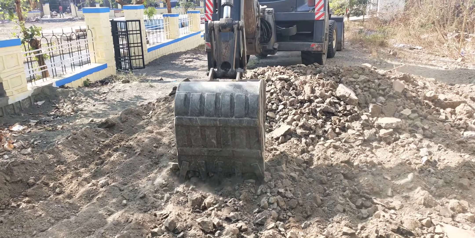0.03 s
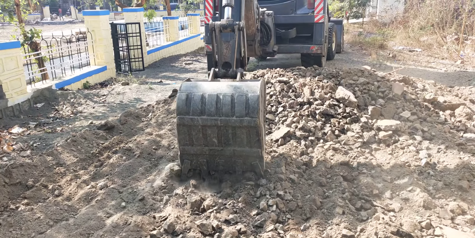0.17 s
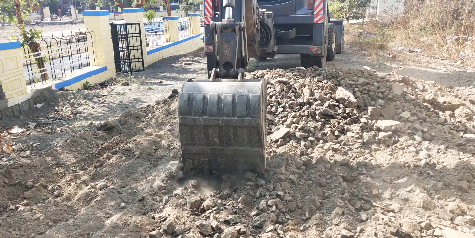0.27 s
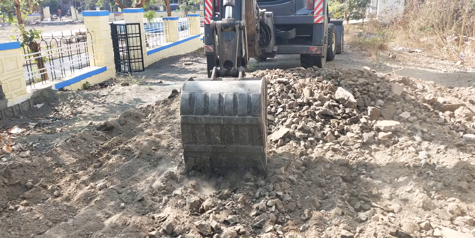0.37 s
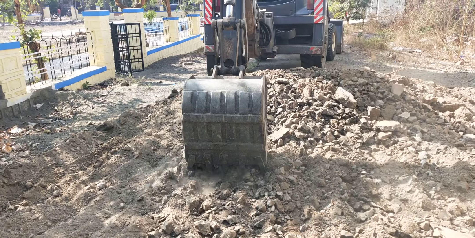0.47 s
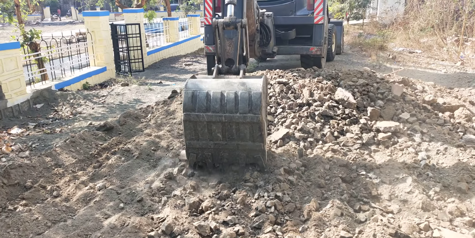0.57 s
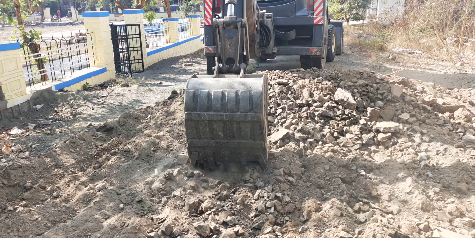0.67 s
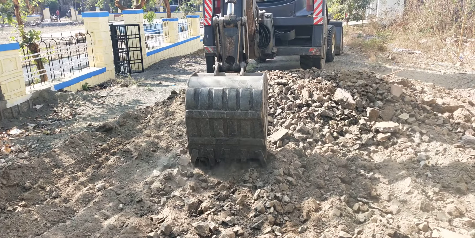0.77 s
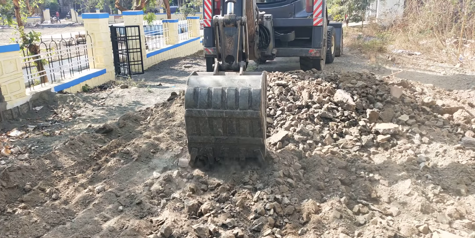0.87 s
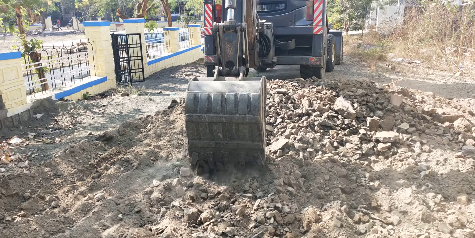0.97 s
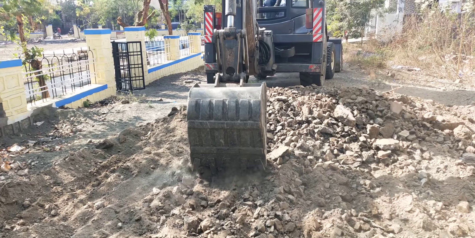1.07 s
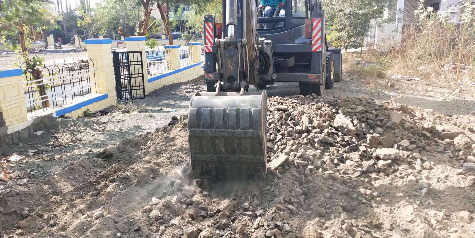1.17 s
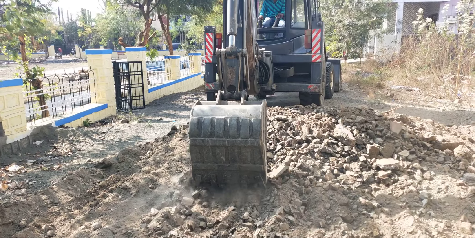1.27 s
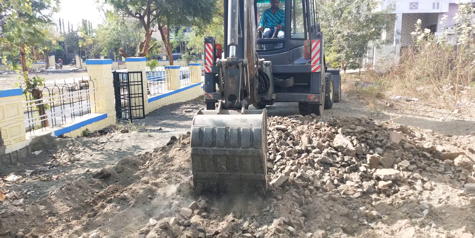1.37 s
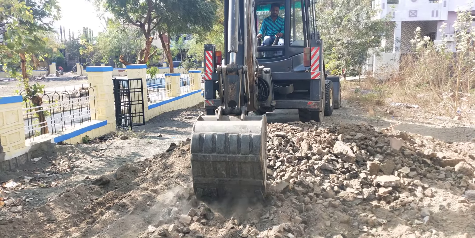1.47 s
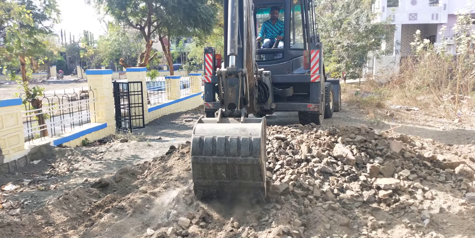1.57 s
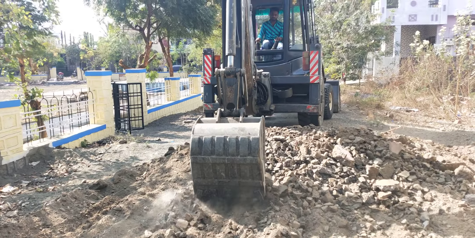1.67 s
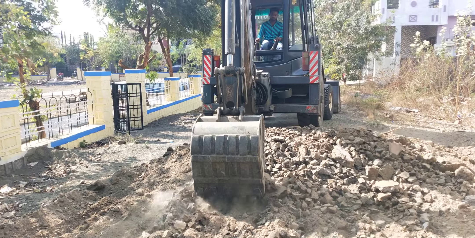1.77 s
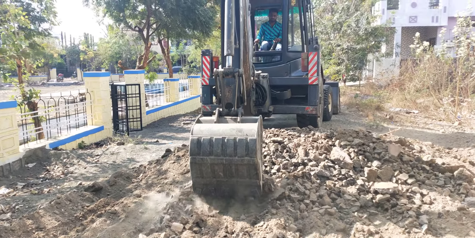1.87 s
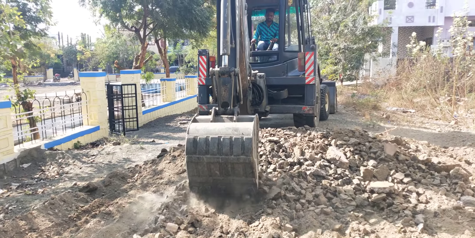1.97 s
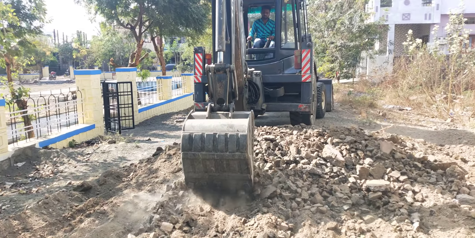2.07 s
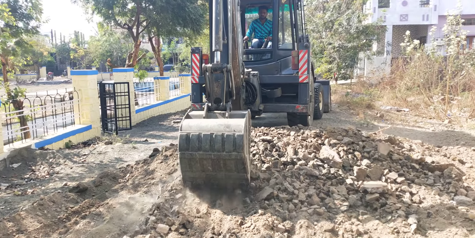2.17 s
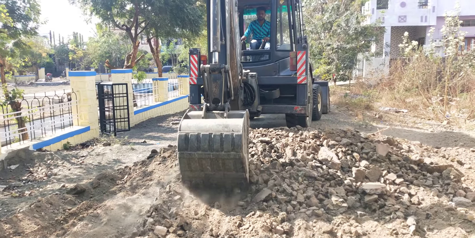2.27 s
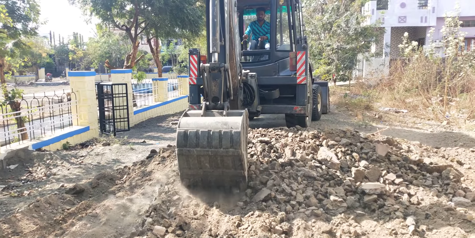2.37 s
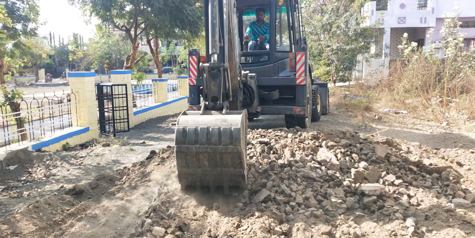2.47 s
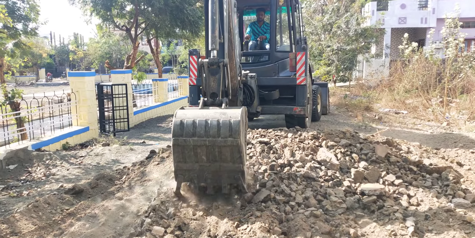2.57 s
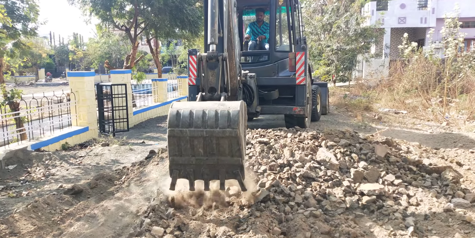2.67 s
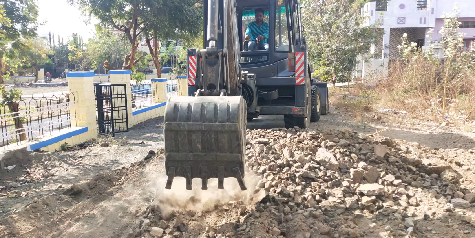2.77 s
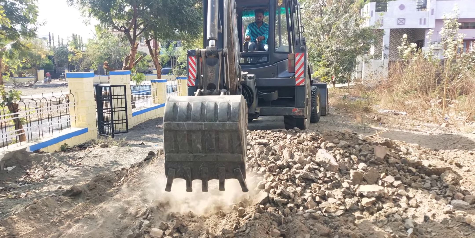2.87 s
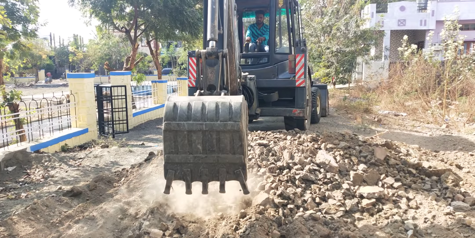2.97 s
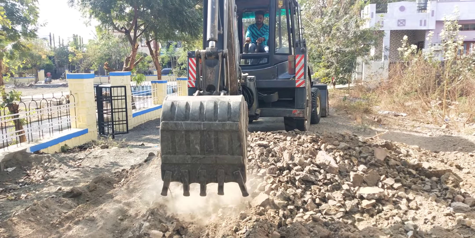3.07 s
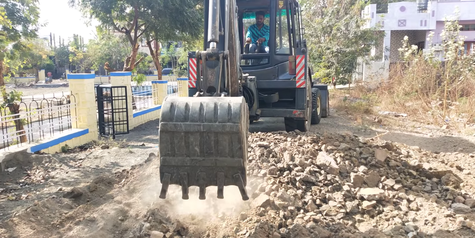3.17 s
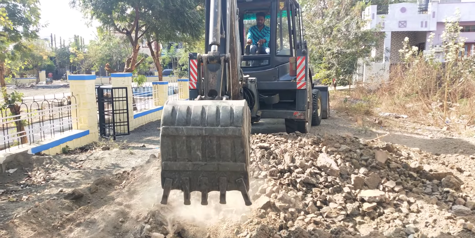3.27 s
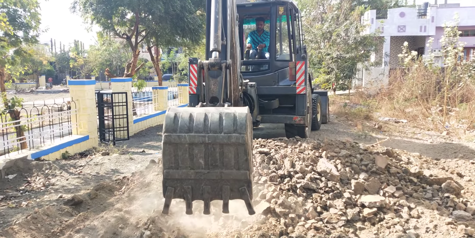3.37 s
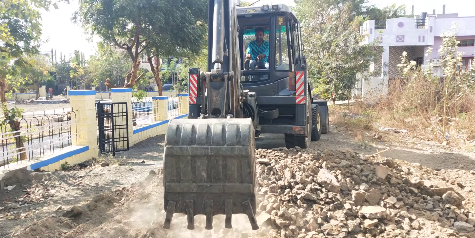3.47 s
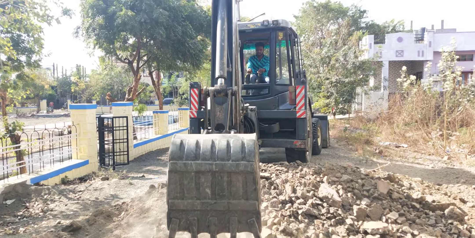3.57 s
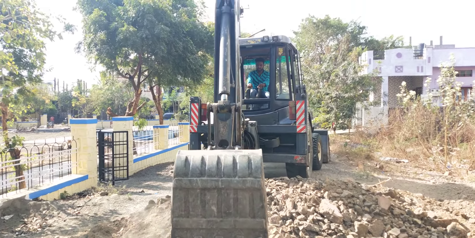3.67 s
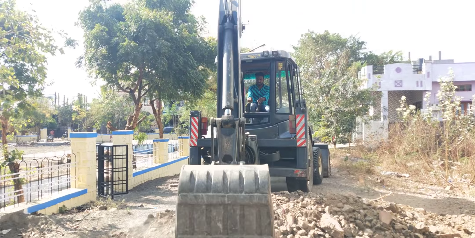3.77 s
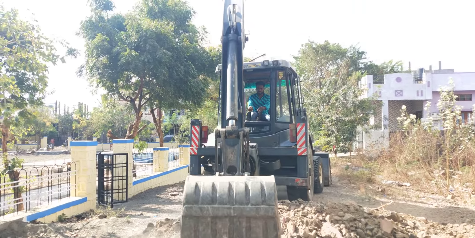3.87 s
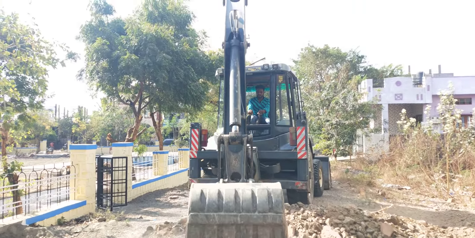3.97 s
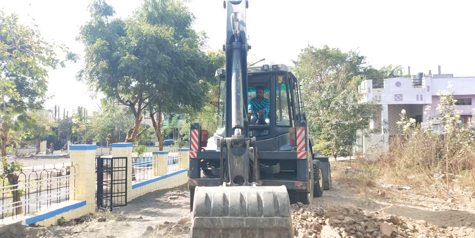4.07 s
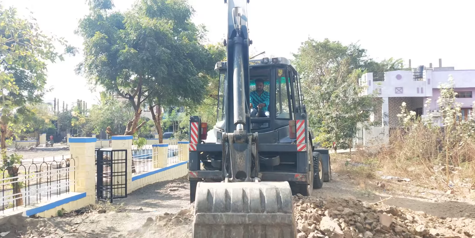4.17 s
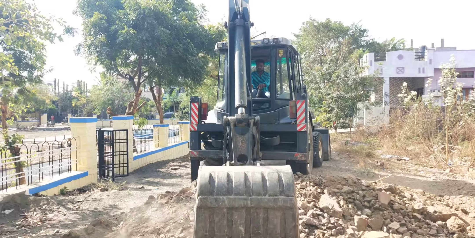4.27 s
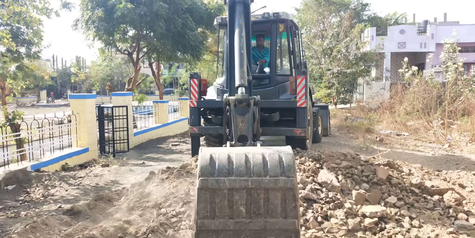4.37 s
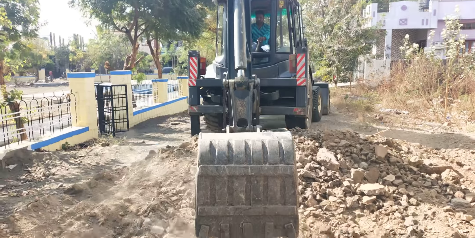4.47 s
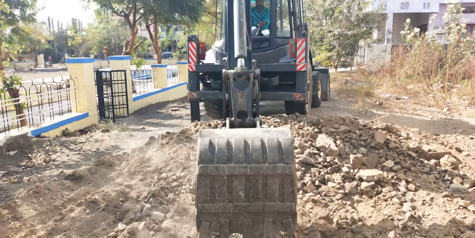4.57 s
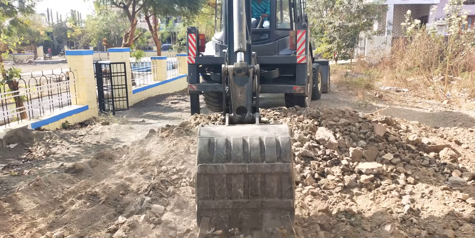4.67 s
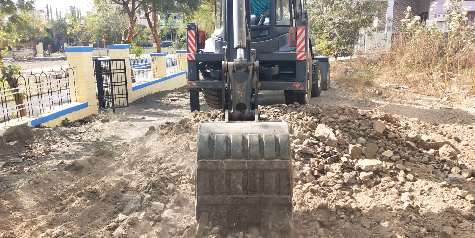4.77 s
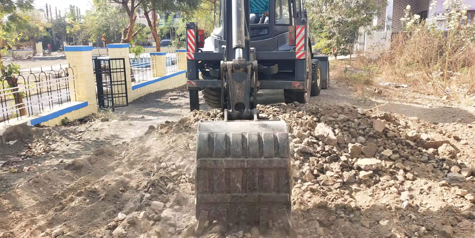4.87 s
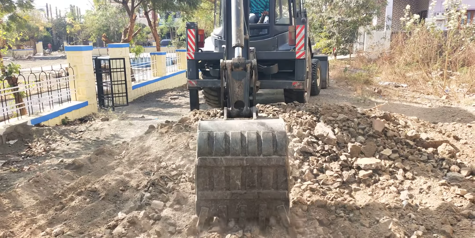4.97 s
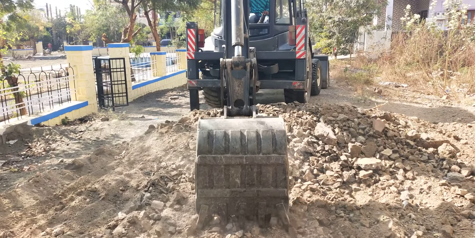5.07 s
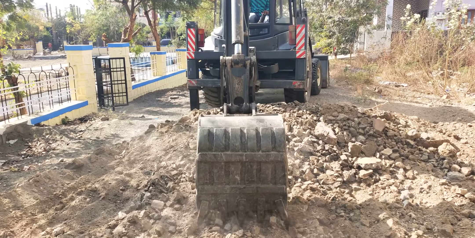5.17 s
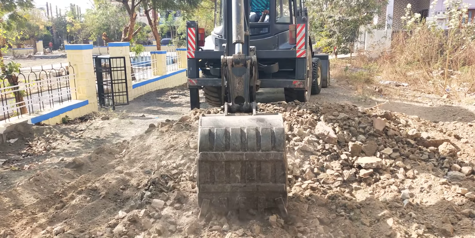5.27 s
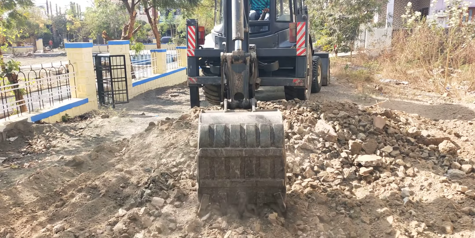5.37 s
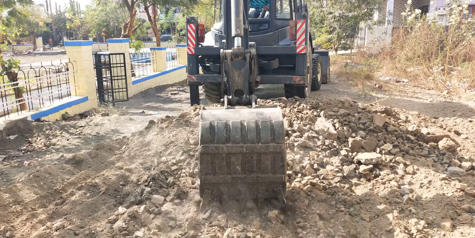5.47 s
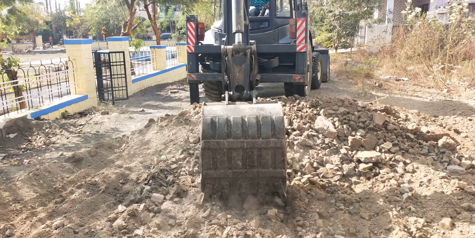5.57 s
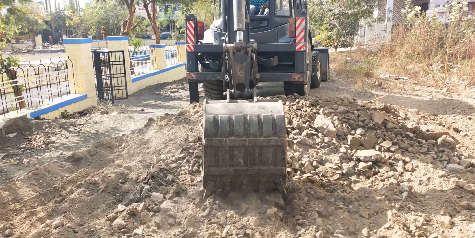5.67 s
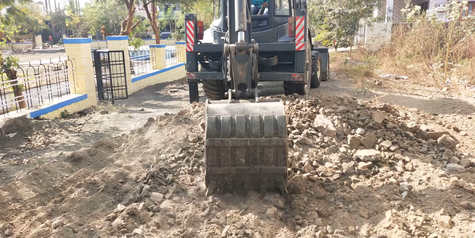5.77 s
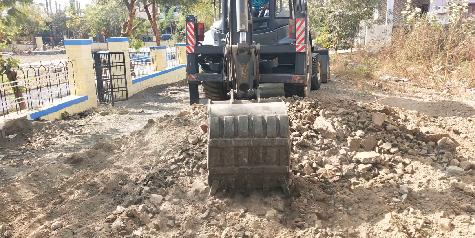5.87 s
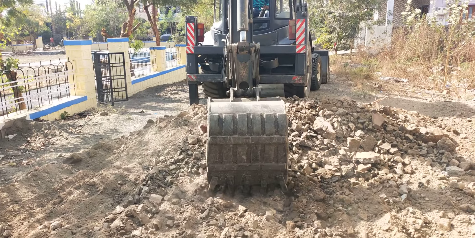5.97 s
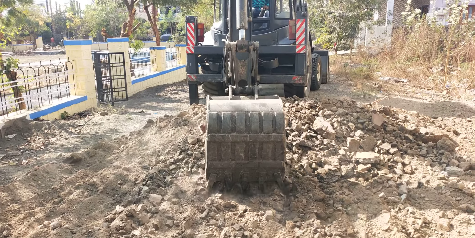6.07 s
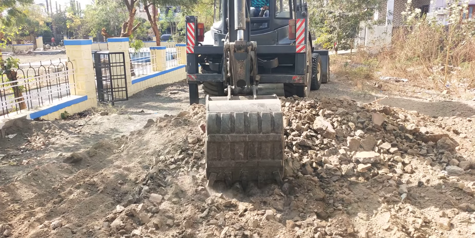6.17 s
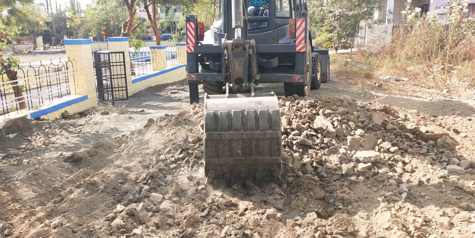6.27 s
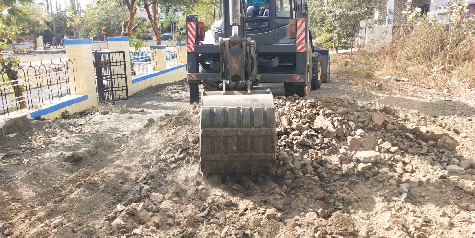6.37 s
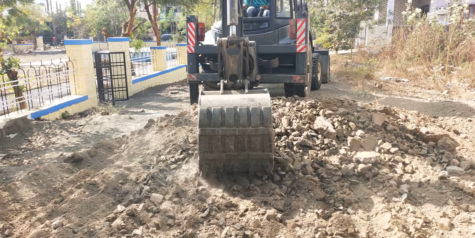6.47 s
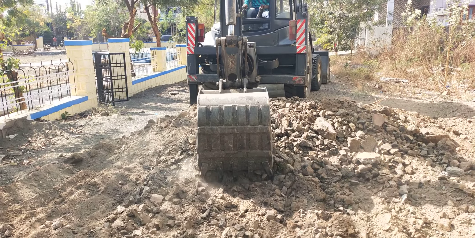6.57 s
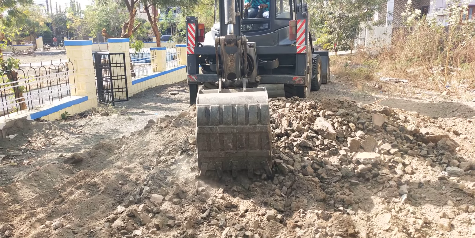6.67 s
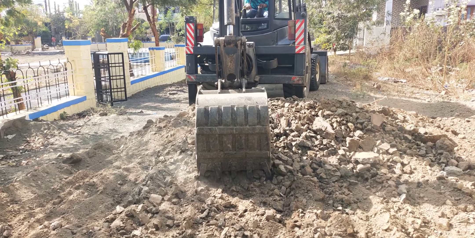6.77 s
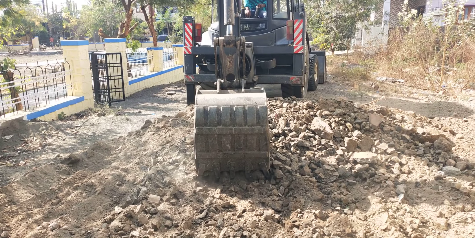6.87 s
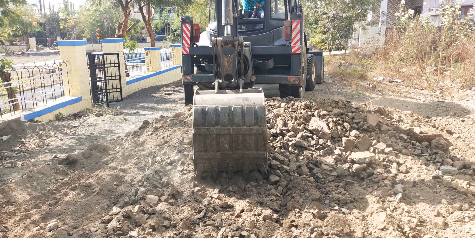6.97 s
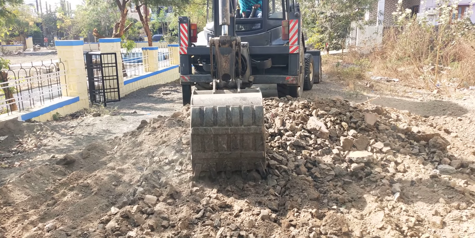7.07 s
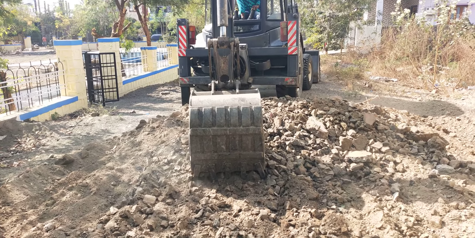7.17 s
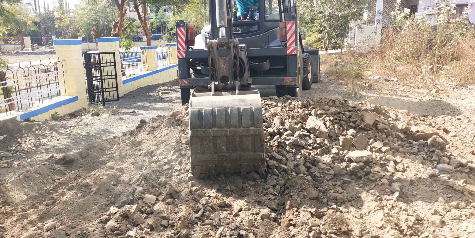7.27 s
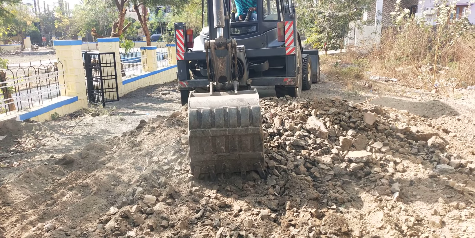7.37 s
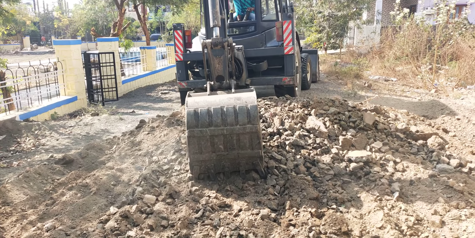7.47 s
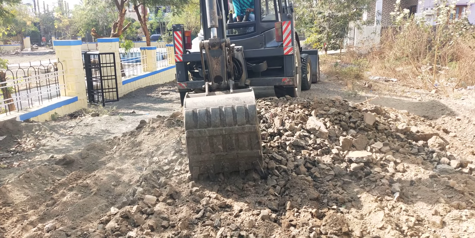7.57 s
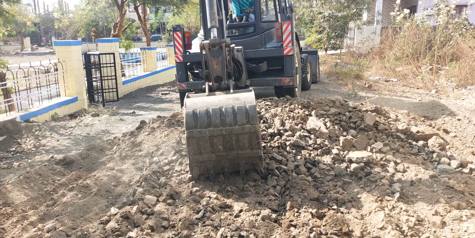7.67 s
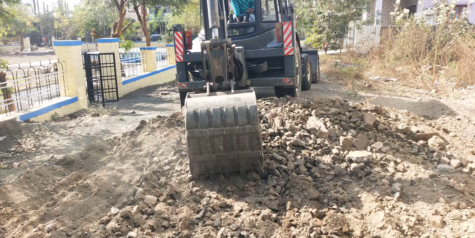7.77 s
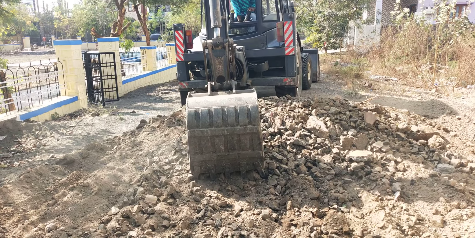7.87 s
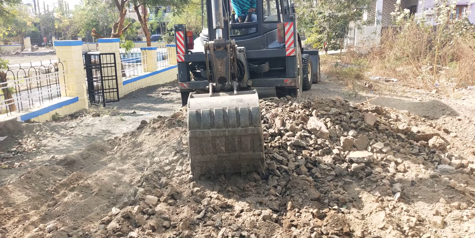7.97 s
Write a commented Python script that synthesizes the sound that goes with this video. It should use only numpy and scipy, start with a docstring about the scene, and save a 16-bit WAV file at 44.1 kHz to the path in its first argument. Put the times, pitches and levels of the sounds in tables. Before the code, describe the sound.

A roadside stone heap, heard close by on a handheld stereo microphone with short scattered wall echoes. From 0 s a heavy steel bucket scrapes rubble with coarse grit, hollow groans around the middle pitches and small stone knocks. At 0.9 to 1.7 s it grows violent: dense, loud clangs and crunches, brief ringing. It quietens by 1.9 s, then one hard clank strikes at 2.4 s. Until 4.4 s a faint low diesel idle remains, with a few loose metal rattles to the left near 3 s and treble oil hiss swelling around 4 s. At 4.5 s the second drag begins, loudest from 4.7 to 5.1 s, with grinding, groans and bangs; further blows at 5.9 and 6.3 s. It thins out, a softer scrape and hiss come at 7.1 to 7.3 s, then weak clunks and idle to 8 s.

```python
"""By a walled road, a steel excavator bucket is dragged twice through broken stone, a few metres from
a handheld camera with two microphone ports. Noise and grit drive many short modes of the shell:
scraping, short fuzzy tones and blows. Behind it a diesel idles as multiples of its firing rate in low
wash, loose parts rattle as narrow noise, and oil hisses through the valves as spurts of treble noise.
Decaying noise makes the echoes of the walls and a short scattering of the treble."""
import sys
import numpy as np
from scipy import signal
from scipy.fft import rfft, irfft
from scipy.io import wavfile
from scipy.ndimage import uniform_filter1d

SR = 44100
rng = np.random.default_rng(int(sys.argv[2]) if len(sys.argv) > 2 else 0)


def to_wav(s):
    """Save 16-bit WAV."""
    ch = np.atleast_2d(s).T  # columns
    pcm = np.round(np.clip(ch, -1, 1) * 32767)  # PCM
    wavfile.write(sys.argv[1], SR, pcm.astype(np.int16))


N = 354167


def gain_of(db):
    """Amplitude factor of a level in dB."""
    return 10 ** (np.asarray(db) / 20)


def evened(x):
    """Scales to an rms of 1."""
    return x / np.sqrt(np.mean(x ** 2) + 1e-20)


def steadied(x, size=7000):
    """Holds the level near 1 over about a sixth of a second; quicker changes stay."""
    power = uniform_filter1d(uniform_filter1d(x ** 2, size), size)
    return x / np.sqrt(abs(power) + 1e-20)


def read_curve(points, hz):
    """Reads a (frequency, value) curve at hz, straight along log frequency."""
    f, value = np.transpose(points)
    return np.interp(np.log(hz + 1), np.log(f + 1), value)


def per_sample(rows):
    """Columns of a (time, ...) table, one value a sample."""
    s, *columns = np.transpose(rows)
    return [np.interp(np.arange(N) / SR, s, column) for column in columns]


def add(mix, s, sound):
    """Lays a sound into the mix at s seconds, cut at the end."""
    part = mix[round(s * SR):][:len(sound)]
    part += sound[:len(part)]


def band(x, lo_hz, hi_hz):
    """Keeps the sound between two frequencies."""
    return signal.sosfilt(signal.butter(3, [lo_hz, hi_hz], "band", fs=SR, output="sos"), x)


def wander(per_s):
    """Slow random drift, joining per_s normal draws a second by straight lines."""
    count = int(N / SR * per_s) + 2
    return np.interp(np.linspace(0, count - 1, N), np.arange(count), rng.standard_normal(count))


def peaks(rows, rise_db_per_s, fall_db_per_s):
    """Level in dB that climbs to each (start, length, dB), holds and falls away."""
    t = np.arange(0, N / SR, .005)
    s, length, db = np.transpose(rows)[:, :, None]
    before, after = np.maximum(s - t, 0), np.maximum(t - s - length, 0)
    level = db - rise_db_per_s * before - fall_db_per_s * after
    return np.interp(np.arange(N) / SR, t, level.max(0))


def patchy(x, depth_db):
    """Lifts and sinks patches about 200 Hz wide and 80 ms long."""
    z = signal.stft(x, nperseg=512, noverlap=384)[2]
    patches = rng.standard_normal(z.shape[::-1]).T
    for _ in range(2):
        patches = uniform_filter1d(uniform_filter1d(patches, size=2, axis=0), size=18, axis=1)
    z = z * gain_of(depth_db * evened(patches))
    return signal.istft(z, nperseg=512, noverlap=384)[1][:N]


def dying_noise(colour, t60, stretch=1.0, size=9000):
    """Noise of energy 1 whose bands die at their own speed: the ring of very many modes."""
    spectrum = rfft(rng.standard_normal(size))
    noise = irfft(spectrum * gain_of(read_curve(colour, np.fft.rfftfreq(size, 1 / SR))), size)
    hz, t, z = signal.stft(noise, SR, nperseg=256, noverlap=192)
    decay_db = -60 * t / (stretch * read_curve(t60, hz)[:, None])
    ring = signal.istft(z * gain_of(decay_db), SR, nperseg=256, noverlap=192)[1][:size]
    return ring / np.linalg.norm(ring)


def spot(stretch=0.88, spread_db=7.0, plate_db=6.0, loose=0.0052):
    """The ring of the bucket struck at one place, which wakes each mode by its own amount."""
    # strongest modes of the shell before chance and stretch: (frequency [Hz], width [Hz], level [dB])
    shell = [(110, 7.4, -16.5), (285, 47, -3), (550, 22, 1), (603.2, 6.8, -1.5), (726, 11, 1),
             (916.5, 48, 6.5), (1103, 24, -2), (1513, 38, -1), (1944, 22, -9.5), (2003, 31, -6.5),
             (2486, 52, -3.5), (2810, 51, -9), (3120, 39, -9.5)]
    # colour of the dense small modes: (frequency [Hz], density [dB per Hz, relative])
    plate = [(35, -65.5), (60, -35), (115, -8.5), (210, -19), (278, -9.5), (413, -13.5), (546, -7.5),
             (721, -2.5), (792, -14), (889, -16.5), (2150, -5.5), (4030, -21), (5200, -13), (6200, -24.5),
             (7030, -32.5), (15500, -49.5)]
    # their decay to -60 dB, before the stretch: (frequency [Hz], time [s])
    plate_t60 = [(100, 0.23), (500, 0.19), (2000, 0.082), (6000, 0.21), (12000, 0.029)]
    t = np.arange(9000) / SR
    hz, width, db = np.transpose(shell)[:, :, None]
    share, detune, phase = rng.standard_normal((3, len(shell), 1))
    height = gain_of(db + spread_db * share) * np.sqrt(width)
    decay = np.exp(-np.pi * width * t / np.sqrt(stretch))
    tones = np.sin(2 * np.pi * (hz * (1 + loose * detune) * t + phase))
    modes = (height * decay * tones).sum(0)
    return modes / np.linalg.norm(modes) + gain_of(plate_db) * dying_noise(plate, plate_t60, stretch)


def grinding(chips_per_s=500, size_db=3.0, grind=0.66):
    """Chips and a fine grinding excite the bucket at eight places, each waking its own mix of modes."""
    out = np.zeros(N)
    for _ in range(8):
        hits = rng.random(N) < chips_per_s / 8 / SR
        chips = gain_of(size_db * np.minimum(rng.exponential(1, N), 3)) * hits
        force = evened(chips) + grind * rng.standard_normal(N)
        force = force * gain_of(5.5 * wander(30) + 6.2 * wander(6))
        out += signal.oaconvolve(force, spot(plate_db=-4.0, loose=.03))[:N]
    return patchy(out, 4.66)


def drone(mode_hz=550, half_width_hz=23.3):
    """The steady drag of the teeth drives the main mode; the load damps and spreads it."""
    force = rng.standard_normal(N) * gain_of(2.9 * wander(40))
    core = band(force, mode_hz - half_width_hz, mode_hz + half_width_hz)
    return evened(core) + 0.55 * evened(band(force, 0.844 * mode_hz, 1.29 * mode_hz))


def scrape():
    """The drags: grinding in four bands follows pressure and grit, and the main mode groans."""
    # two drags through the rubble: (time [s], pressure on the shell [dB], grit of the stones [dB])
    drag = [
        [(0.0, -27.5, -35.5), (0.08, -51, -42.5), (0.19, -33, -31.5), (0.3, -43.5, -44.5), (0.53, -35.5, -44.5),
         (0.77, -42.5, -41.5), (0.95, -24, -27), (1.06, -55.5, -46), (1.2, -31.5, -36.5), (1.335, -40, -34.5),
         (1.38, -24.5, -32), (1.59, -29, -29.5), (1.71, -31, -29.5), (1.78, -38.5, -37), (1.93, -55.5, -74),
         (2.26, -68, -67), (2.38, -39.5, -49), (2.5, -53, -61), (2.69, -72.5, -62), (3.2, -84.5, -67.5)],
        [(4.45, -87, -63), (4.52, -28, -33), (4.65, -47, -65), (4.71, -27, -30), (4.8, -34, -29),
         (4.9, -30, -28), (5.1, -26, -38), (5.2, -35, -40), (5.33, -55, -53), (5.4, -41, -68), (5.51, -36, -49),
         (5.6, -40, -41.5), (5.7, -42.5, -65), (5.75, -41.5, -45.5), (6.09, -42, -46), (6.42, -49, -59),
         (6.59, -51.5, -45), (6.69, -60, -63), (6.93, -61, -66), (7.07, -59, -62), (7.14, -31.5, -45),
         (7.22, -28.5, -45), (7.32, -49.5, -68), (7.46, -59, -63.5), (7.52, -53, -60.5), (7.59, -46.5, -62),
         (7.83, -62, -58.5), (8.03, -64, -65)],
    ]
    # groans of the main mode: (start [s], length [s], level [dB])
    groans = [(.04, 0.079, -38.5), (.175, 0.0047, -19.5), (.21, 0.013, -29), (.26, 0.2, -36),
              (.46, 0.18, -36), (.62, 0.32, -43.5), (.92, 0.049, -26), (1.12, 0.036, -27.5),
              (1.38, 0.18, -33), (4.5, 0.14, -44), (4.72, 0.11, -29.5), (5.08, 0.17, -36),
              (5.27, 0.042, -31), (5.33, 0.037, -50), (5.44, 0.15, -28.5), (5.63, 0.066, -35),
              (5.78, 0.17, -36), (5.91, 0.075, -27), (6.16, 0.13, -36.5), (6.4, 0.089, -38),
              (6.55, 0.025, -43), (6.75, 0.019, -43.5)]
    press_db, grit_db = per_sample(drag[0] + drag[1])
    load_db = -54.5 + 0.91 * (press_db + 40)
    fine_db = -55.5 + 0.7 * (grit_db + 40)
    groan_db = peaks(groans, 451.5, 150.5)
    ground = grinding()
    layers = [
        (load_db, band(ground, 210, 380)),  # thud of the load
        (press_db, band(ground, 470, 1100)),
        (grit_db, band(ground, 1100, 3500)),
        (fine_db, band(ground, 3500, 15500)),  # finest grit
        (groan_db, drone()),
    ]
    return sum(gain_of(db) * steadied(part) for db, part in layers)


def in_turns(x, irs_of, places, turns):
    """Sends x through several random stereo responses that fade into one another."""
    out, turn = np.zeros((2, N)), np.cumsum(rng.integers(1, places, turns)) % places
    for k in range(places):
        share = np.interp(np.linspace(0, turns - 1, N), np.arange(turns), turn == k)
        out += signal.oaconvolve((np.sqrt(share) * x)[None], irs_of(), axes=1)[:, :N]
    return out


def scatter(x):
    """Short treble scattering, different at each port, fading between six random responses."""
    colour = [(1500, -19.0), (3000, -25), (4500, -5), (8000, -1.0)]  # (frequency [Hz], level [dB])
    t60 = [(100, 0.057), (9000, 0.0063)]  # (frequency [Hz], time [s])

    def bounces():
        taps = [dying_noise(colour, t60, size=2048) for _ in range(2)]
        return np.array(taps) * gain_of([[-.6], [.6]])
    return in_turns(x, bounces, places=6, turns=80)


def walls(x, side_hz=600):
    """Scattered echoes, fading between four random tails; bass alike at both ports, treble unlike."""
    # decay of the echoes to -60 dB: (frequency [Hz], time [s])
    echo_t60 = [(200, 0.23), (1000, 0.33), (5000, 0.32), (12000, 0.18)]
    colour = [(80, -12), (600, 0), (3000, 1.5), (7000, 7)]  # (frequency [Hz], level [dB])
    high_pass = signal.butter(2, side_hz, "high", fs=SR)

    def echoes():
        mid, side = [np.r_[np.zeros(120), dying_noise(colour, echo_t60, size=24000)] for _ in range(2)]
        side = signal.lfilter(*high_pass, side)
        return np.array([mid + side, mid - side]) / np.sqrt(2)
    return in_turns(x, echoes, places=4, turns=40)


def engine():
    """Idling diesel: low multiples of the firing rate; the upper ones waver most."""
    # the idle before its jitter: (time [s], firing rate [Hz], level [dB])
    firing = [(0, 44.7, -51), (.7, 45.66, -50), (1.3, 44.2, -50), (1.7, 44.1, -60), (2.3, 43.62, -57),
              (3.2, 43.6, -56.5), (4.3, 43.8, -50.5), (5.2, 45, -58), (6, 45.6, -50), (6.7, 44.7, -50.5),
              (7.2, 46.25, -50), (8.03, 45.16, -50)]
    # its multiples before they waver: (multiple of the firing rate, level [dB re the idle])
    order = [(1, 1.5), (2, -6.5), (3, -9.5), (3.25, -13), (4, -12.5), (5, -13.5)]
    hz, db = per_sample(firing)
    turns = np.cumsum(hz * (1 + 0.0099 * wander(6.2))) / SR
    tones = np.zeros(N)
    for multiple, order_db in order:
        waver_db = 1.5 * np.log(multiple + 0.2) * wander(6.8)
        tones += gain_of(order_db + waver_db) * np.sin(2 * np.pi * (multiple * turns + rng.random()))
    return np.sqrt(2) * gain_of(db) * tones


def wash(colour, same, lead_s, patchy_db):
    """Wide noise in drifting patches; the share that both ports have in common reaches the left first."""
    frames, hz = N // 256 + 5, np.fft.rfftfreq(1024, 1 / SR)[:, None]
    a, b, c, d, patches = rng.standard_normal((frames, 513, 5)).T
    patches = evened(uniform_filter1d(uniform_filter1d(patches, 5, 0), 16, 1))
    left, other = a + 1j * b, c + 1j * d
    right = same * left * np.exp(-2j * np.pi * hz * lead_s) + np.sqrt(1 - same ** 2) * other
    z = np.array([left, right]) * gain_of(read_curve(colour, hz) + patchy_db * patches)
    return signal.istft(z, nperseg=1024, noverlap=768)[1][:, :N]


def engine_wash():
    """Broad low noise of the engine, the same at both ports but earlier and louder at the left."""
    # its colour before scaling: (frequency [Hz], density [dB per Hz])
    site = [(18, -39), (30, -6.5), (59, -6), (159, -13), (268, -17), (480, -17.5), (900, -21.5),
            (1250, -19.5), (2200, -30), (2700, -39), (3500, -36.5), (4050, -50.5), (4440, -35),
            (5570, -29.5), (7000, -71.5), (9100, -67), (15400, -120)]
    noise = wash(site, 1.0, 0.0004, 3.2)
    noise = noise / np.std(band(noise[0], 250, 7000))
    return gain_of(-58) * noise * gain_of([[2.5], [-2.5]])


def fuzzy_tones(rows, sharpness, rasp_db):
    """Each row is a fuzzy, stuttering tone that swells quickly and fades."""
    out = np.zeros(N)
    for s, db, hz, length in rows:
        u = np.arange(9000) / SR / length
        share = sharpness + 20 / hz  # half width re the pitch
        stutter = gain_of(2.9 * evened(uniform_filter1d(rng.standard_normal(13000), size=500)))
        grain = stutter * rng.standard_normal(13000) ** 3
        core = band(grain, hz * (1 - share), hz * (1 + share))[4000:]
        rasp = band(grain, 0.69 * hz, 1.455 * hz)[4000:]  # a wider band around the pitch rasps along
        fuzz = evened(core) + gain_of(rasp_db) * evened(rasp)
        envelope = (1 - np.exp(-u / 0.018)) * np.exp(-1.5 * u ** 2)
        add(out, s, gain_of(db) * evened(fuzz) * envelope)
    return out


def shell_tones():
    """Short narrow fuzzy tones of the shell, alone or together with a blow."""
    # the tones: (time [s], level before swell and fade [dB], pitch [Hz], length [s])
    tone_rows = [(0.047, -36, 1340, 0.24), (.13, -34.5, 2750, 0.062), (0.29, -28.5, 1900, 0.02),
                 (.41, -39.5, 2570, 0.19), (0.605, -37.5, 2740, 0.066), (.73, -39, 1935, 0.17),
                 (.905, -26, 271, 0.07), (1.24, -19.5, 283, 0.053), (1.245, -25, 115, 0.065),
                 (1.346, -16.5, 1540, 0.032), (1.394, -19, 1575, 0.023), (1.855, -39, 2615, 0.09),
                 (2.006, -40.5, 2490, 0.1), (1.985, -36.5, 2786, 0.086), (2.039, -42, 552, 0.046),
                 (2.28, -49, 480, 0.26), (2.373, -23, 1060, .04), (2.385, -33.5, 455, 0.092),
                 (2.497, -41.5, 582, 0.05), (2.552, -42, 2290, 0.042), (2.553, -44.5, 3003, 0.018),
                 (2.756, -50, 107.8, 0.21), (2.846, -41.5, 718, 0.092), (2.858, -49, 873, 0.16),
                 (2.935, -40.5, 470, 0.036), (4.492, -37, 4980, 0.042), (4.492, -35.5, 2320, 0.035),
                 (4.73, -28, 167, 0.049), (4.86, -30, 287, .12), (5.065, -19, 285, 0.031),
                 (5.12, -29.5, 285, 0.051), (4.761, -15, 2215, 0.019), (4.765, -29, 4640, 0.028),
                 (5.234, -33, 3150, 0.043), (5.234, -39, 2490, 0.043), (5.372, -35.5, 2376, 0.037),
                 (5.372, -40, 1890, 0.15), (5.461, -32, 279, 0.15), (5.453, -37, 2704, 0.055),
                 (5.553, -42, 1860, 0.15), (5.563, -46.5, 4820, 0.068), (5.765, -32, 2463, 0.044),
                 (6.043, -37.5, 2520, 0.013), (6.137, -40, 3280, 0.044), (6.305, -29.5, 3190, 0.049),
                 (6.325, -24, 1530, 0.062), (6.541, -44, 3200, 0.072), (6.536, -44.5, 950, 0.1),
                 (6.529, -45.5, 1613, 0.091), (6.149, -43, 2480, 0.033), (6.72, -46.5, 960, 0.071),
                 (6.77, -42, 468, 0.071), (6.976, -47, 454.5, 0.14), (7.003, -49, 1055, 0.068),
                 (7.104, -33, 616, 0.34), (7.12, -50, 1530, .04), (7.14, -34, 738, 0.14),
                 (7.493, -40, 670, 0.12), (7.549, -36, 686, 0.081), (7.485, -46.5, 3310, 0.058),
                 (7.558, -48.5, 2180, 0.05), (7.637, -41, 291.5, 0.023)]
    return fuzzy_tones(tone_rows, 0.044, -7.5)


def blow_force(crunch_s, soft, t):
    """Force of a blow: a first contact, a swelling crunch and chips that rattle on."""
    swell = 1 - np.exp(-(t + 1e-4) / (0.00086 * soft ** 2))
    crunch = rng.standard_normal(6000) ** 3 * np.exp(-t / crunch_s) * (rng.random(6000) < .12)
    chips = rng.standard_normal(6000) * (rng.random(6000) < 900 / SR)  # 900 a second
    force = swell * (crunch + gain_of(-1.5 - 60 * t / 0.37) * chips)
    force[0] = 13.2 / soft ** 2  # the first contact
    return force


def blows(sharp_s=0.005):
    """A small hard stone lands sharply, a heap with a swelling crunch; each blow has its own colour."""
    # stones striking the bucket, before echoes and rounding: (time [s], nominal peak [dB],
    # boom, thud, clang [dB re peak], crunch [s, held to 1-30 ms])
    blow_rows = [ (.058, -16.5, -20, -34, -11.5, 0.0042), (.103, -13, -26.5, -31, -17, 0.0053),
                 (.132, -18.5, -29, -17.5, -0.5, 0.0034), (.172, -17.5, -31, -27, 0, 0.0041),
                 (0.447, -16.5, -18, -9, -4, 0.0064), (.61, -25, -37, -34, -10, 0.0048),
                 (.8, -21, -33, -44, 0, 0.0062), (0.861, -17.5, -7, -2.5, 1.5, 0.0087),
                 (.908, -9.5, -5.5, -3.5, -6, 0.0054), (.949, -29, 0, -7, -2, 0.01),
                 (1.045, -22.5, -12, -22, 2, 0.0043), (1.105, -18, -4, -17, -1.5, 0.021),
                 (1.134, -3.5, -15, -17, -5.5, 0.0053), (1.23, -5, -31, -10.5, -5.5, 0.01),
                 (1.255, -4, -7.5, -8.5, -8, 0.0042), (1.346, -1, -23.5, -18, -7.5, 0.001),
                 (1.393, -2.5, -17, -33, -3.5, 0.0027), (1.438, -10, -23, -37, -2.5, 0.0076),
                 (1.486, -19, -32, -24, 3, 0.0096), (1.501, -5, -21, -10.5, 0, 0.0018),
                 (1.586, -13, -40, -13, -11, 0.0067), (1.648, -12, -53, -32, 2.5, 0.0029),
                 (1.672, -9, -50, -31, 1, 0.0097), (1.712, -16, -47, -14.5, 6, 0.0032),
                 (1.984, -26.5, -15, -4, -2, 0.0075), (2.351, -18, -38, -17.5, 4, 0.0086),
                 (2.371, -3.5, -48, -21.5, 3, 0.0054), (2.415, -31, -38, -4, -6, 0.0091),
                 (2.848, -38, -4, -18, -11, 0.018), (2.94, -31.5, -16.5, -21.5, -2, 0.0073),
                 (4.49, -13.5, -12, -30, -4.5, 0.0065), (4.686, -12, -33, -17.5, -10.5, 0.011),
                 (4.715, -12.5, -9, -7.5, -0.5, 0.017), (4.76, -8.5, -24, -20, 6.5, 0.0059),
                 (4.82, -2.5, -37, -14.5, -7.5, 0.004), (4.872, -13.5, -50, -16, -8, 0.02),
                 (4.887, -3.5, -38, -12, -3.5, 0.004), (5.025, -9, -35, -14, -17.5, 0.0065),
                 (5.068, -3, -39, -10, -1.5, 0.0084), (5.239, -14, -42, -30.5, -9.5, 0.0067),
                 (5.315, -26.5, -20, -22, -12, 0.0095), (5.375, -13.5, -32, -32, -22, 0.0061),
                 (5.452, -14, -19, -16.5, -28, 0.015), (5.565, -14.5, -16, -4, -13.5, 0.0042),
                 (5.768, -20.5, -36, -29, -5.5, 0.0075), (5.892, -5.5, -33, -9.5, -2.5, 0.011),
                 (6.26, -20.5, -10, 4.5, -4.5, 0.021), (6.303, -6, -37, -14, -2, 0.011),
                 (6.344, -11, -37, -22, 1, 0.0022), (6.405, -18.5, -20, -10.5, 0, 0.009),
                 (7.085, -41.5, -17, 14, 5.5, 0.011), (7.166, -18.5, -10.5, -8, -3, 0.0056),
                 (7.192, -26, -10, 4, 11, 0.0051), (7.214, -34.5, -2, 2.5, 12, 0.013),
                 (7.485, -62, -21.5, -6, 24, 0.015), (7.55, -34.5, -9, -12.5, -10, 0.0073)]
    out, t = np.zeros(N), np.arange(6000) / SR
    edges = (480, 1200), (70, 190), (240, 350), (1200, 3500), (3500, 9000)  # body, boom, thud, clang, crack
    for s, peak_db, boom_db, thud_db, clang_db, crunch_s in blow_rows:
        crack_db = -11.5 + 1.48 * clang_db
        spray_db = crack_db - 26.5
        colour_db = [0, boom_db, thud_db, clang_db, crack_db, spray_db]
        crunch_s = np.clip(crunch_s, .001, .03)
        soft = crunch_s / sharp_s
        stretch = 0.18 / 0.13 * (crunch_s / 0.0045) ** 0.16  # longer crunches ring on longer
        ring = patchy(signal.fftconvolve(blow_force(crunch_s, soft, t), spot(stretch)), 2.36)
        u = np.arange(len(ring)) / SR
        ring = ring * (1 + 0.56 * np.exp(-u / (0.0094 + crunch_s)))  # the rubble soon damps the shell
        # fine chips fizz away after the blow
        spray = patchy(rng.standard_normal(len(ring)), 5.8)
        spray = spray * (1 - np.exp(-u / (crunch_s + .008))) * gain_of(-60 * u / 0.24)
        parts = [band(ring, *edge) for edge in edges] + [band(spray, 5500, 14000)]
        for db, part in zip(colour_db, parts):
            loudest_rms = np.sqrt(uniform_filter1d(part ** 2, size=600).max())
            add(out, s, gain_of(peak_db + db) * part / (3.99 * loudest_rms))  # nominal peak from rms
        # the dry knock of a hard contact, weaker the softer the blow
        knock = np.sin(2 * np.pi * 1240 * rng.uniform(.7, 1.3) * t) * np.exp(-t / 0.0011)
        add(out, s, gain_of(peak_db - 2.5) / (1 + soft ** 2) * knock)
    return out


def creaks(count=24, floor_db=-56.5, modes_hz=(714, 985, 1080, 1470)):
    """Rows for faint rattles at chance times, at the pitch of one of four modes."""
    rows = []
    for when, loud, which, long in rng.random((count, 4)):
        hz = modes_hz[int(which * len(modes_hz))]
        rows.append((when * N / SR, floor_db + 6 * loud, hz, 0.016 + 0.031 * long))
    return rows


def from_left(x, tilt_db):
    """A source off to the left: 18 samples later at the right port, and weaker there."""
    return np.array([x, np.r_[np.zeros(18), x[:-18]]]) * gain_of([[tilt_db], [-tilt_db]])


def oil_hiss():
    """Spurts of oil through the valves: treble noise, mostly unlike at the two ports."""
    # the spurts: (start [s], length [s], level [dB])
    spurts = [(2.33, 0.27, -71), (2.95, 0.83, -63.5), (3.4, 0.63, -60), (3.95, 0.55, -55), (4.5, 0.12, -74),
              (6.31, 0.044, -64), (6.55, 0.1, -69), (7.1, 0.29, -57.5), (7.35, 0.62, -64.5)]
    # colour of the valves, before scaling: (frequency [Hz], density [dB per Hz])
    valves = [(3530, -42), (6000, 6.5), (7310, -8), (8720, 3.5), (9380, -7.5), (10400, 2.5), (12700, -3.5),
              (14300, 9.5), (16000, -22)]
    level_db = np.maximum(peaks(spurts, 144, 105), -99)  # the valves always leak a little
    return gain_of(level_db) * evened(wash(valves, 0.17, .00041, 1.2))


def rattles():
    """Loose parts rattle on the machine, off to the left, and the walls answer."""
    # the rattles, before swell, fade and placing: (time [s], level [dB], pitch [Hz], length [s])
    rattle_rows = [(2.98, -50, 940, 0.049), (3.02, -32.5, 942, 0.041), (3.08, -40.5, 930, 0.053),
                   (3.43, -50.5, 918, 0.043), (3.7, -54.5, 1462, 0.061), (3.89, -52.5, 923, 0.045),
                   (4.02, -49.5, 710, 0.032), (4.025, -51.5, 2105, 0.033), (7.87, -45, 1484, 0.052),
                   (7.875, -46.5, 946, 0.098)]
    rattle = fuzzy_tones(rattle_rows + creaks(), 0.024, -15.5)
    return from_left(rattle, 3.5) + gain_of(-4.0) * walls(rattle)


def scene():
    """Bucket in front, engine and oil hiss behind it."""
    bucket = scrape() + shell_tones() + blows()
    # the bucket reaches the right port two samples sooner, the left slightly louder
    direct = np.array([np.r_[0, 0, bucket[:-2]] * gain_of(0.38), bucket])
    near = direct + gain_of(1.5) * scatter(bucket) + gain_of(-3.5) * walls(bucket)
    return near + from_left(engine(), 1.2) + engine_wash() + oil_hiss() + rattles()


def record(dry):
    """The microphone dips near 8 kHz, rounds off the loudest peaks, drops deepest bass and top treble."""
    knee, ceiling = 0.5, 0.85  # full scale is 1
    dry = dry - 0.46 * signal.lfilter(*signal.iirpeak(8000, 2.5, fs=SR), dry)
    rounded = knee + (ceiling - knee) * np.tanh((abs(dry) - knee) / (ceiling - knee))
    dry = np.where(abs(dry) < knee, dry, np.sign(dry) * rounded)
    dry = signal.sosfilt(signal.butter(4, 36, "high", fs=SR, output="sos"), dry)
    low_pass = signal.firwin(511, 15900, window=("kaiser", 9), fs=SR)
    return signal.oaconvolve(dry, low_pass[None], "same")


dry = scene()
out = record(dry)
to_wav(out)
```